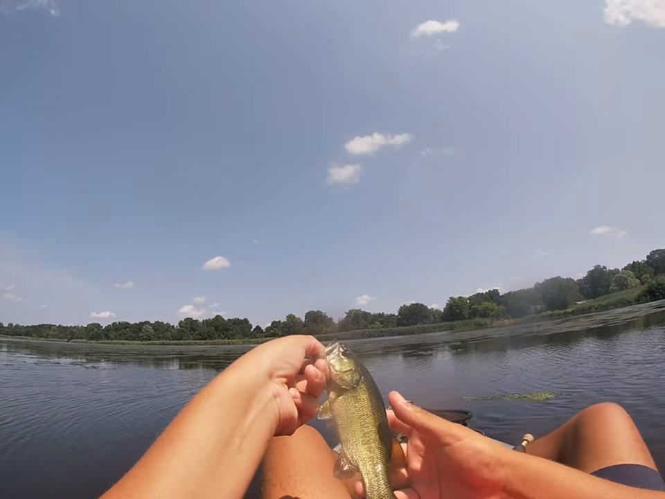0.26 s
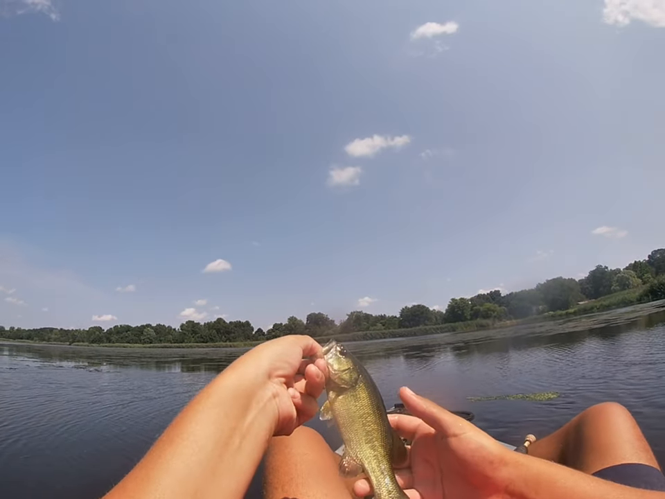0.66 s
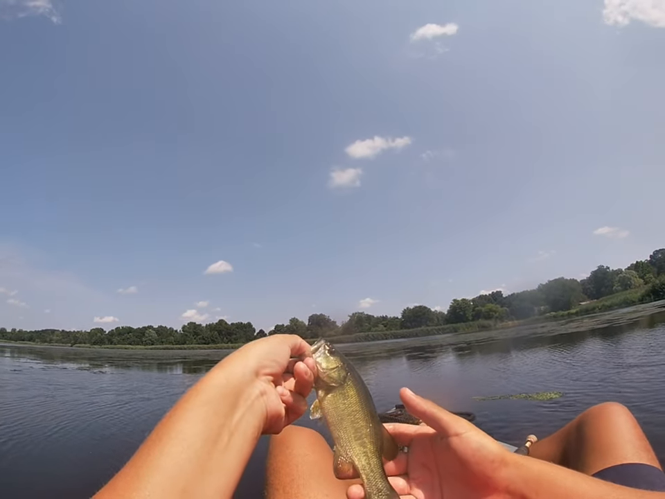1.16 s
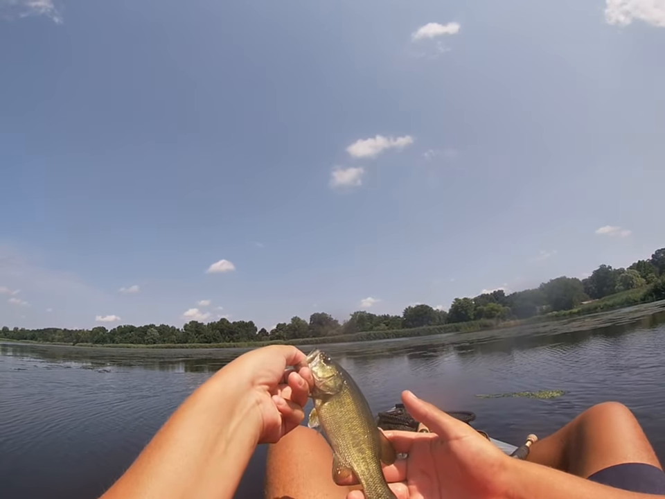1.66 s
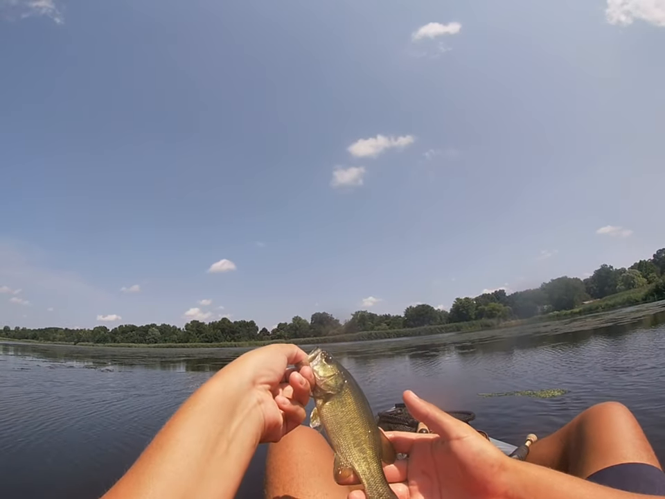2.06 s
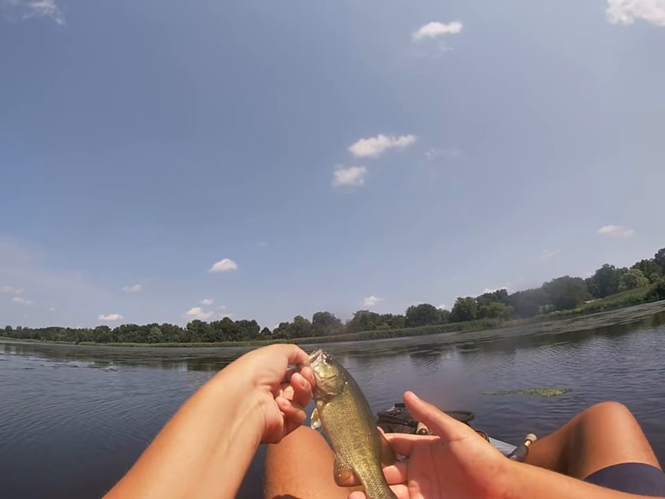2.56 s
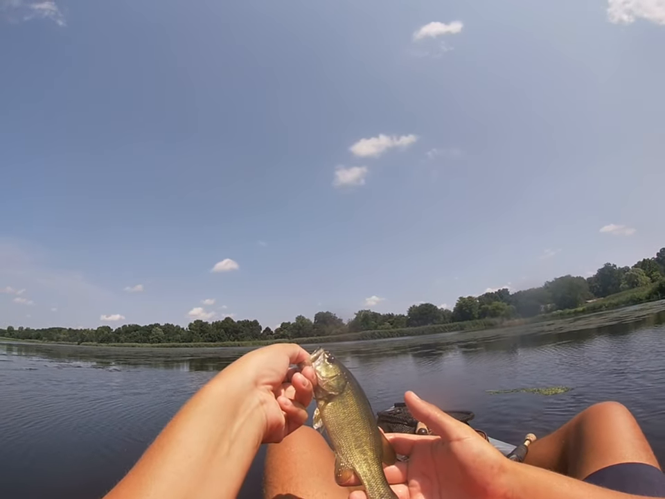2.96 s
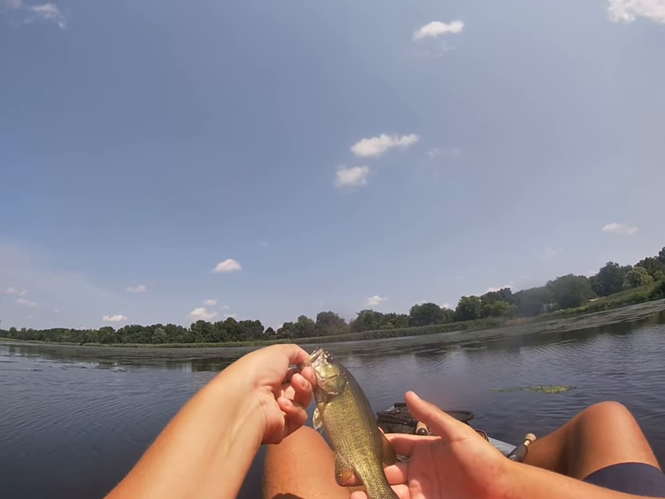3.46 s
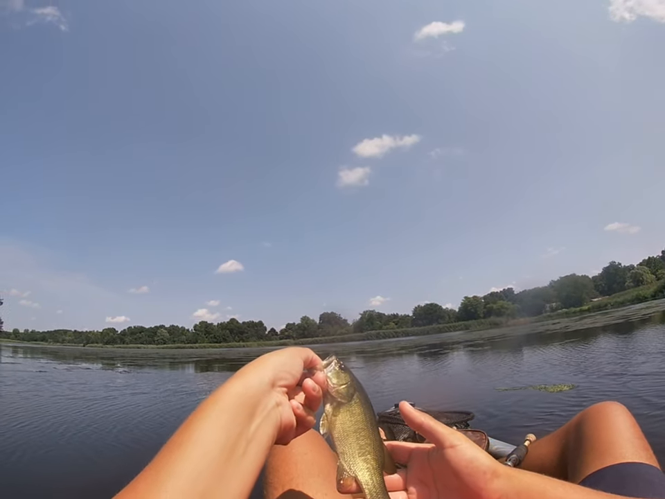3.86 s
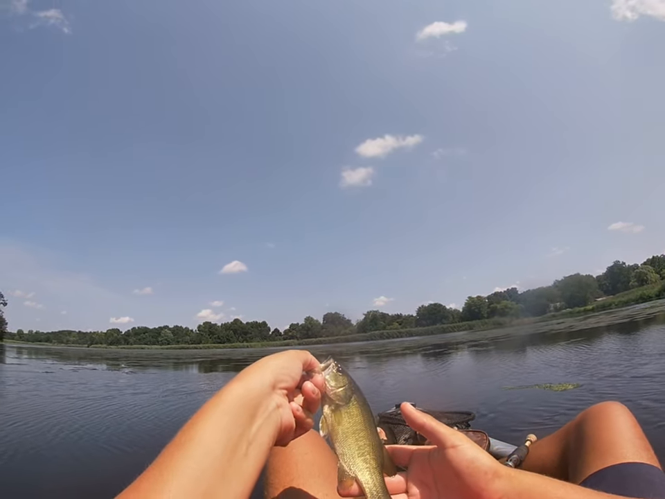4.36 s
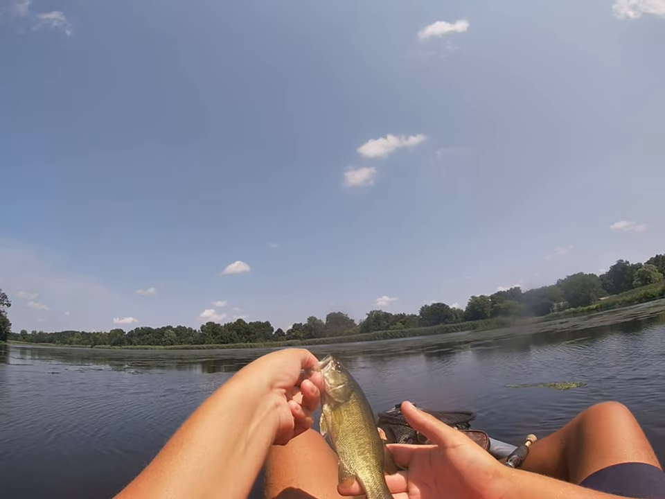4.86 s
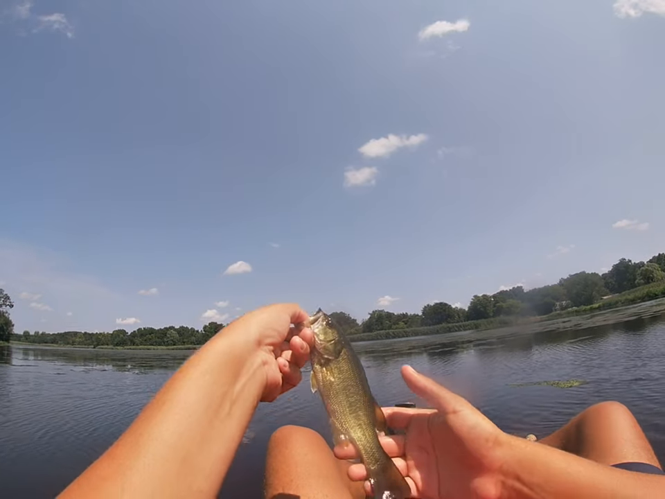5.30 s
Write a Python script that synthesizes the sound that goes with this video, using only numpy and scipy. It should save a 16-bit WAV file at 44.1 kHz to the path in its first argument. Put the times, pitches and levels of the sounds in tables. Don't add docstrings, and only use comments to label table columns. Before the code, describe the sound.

A quiet lake in open air, heard in mono from a small boat. At about 0.05 s something hard knocks the plastic hull, with two very faint bounces by 0.12 s. Throughout, two distant motors drone low at nearly fixed, slightly different pitches, one creeping up and the other down; their overtones waver and fade unevenly, dulling overall. Low wind buffeting and flutter are strong at the opening, ease from about 0.6 to 3 s with a short puff near 1.3 s, and swell again around 3.7-4.6 s. Small dry insect ticks run about five per second, slightly uneven with a few gaps, while a second insect ticks every 0.64 s until about 5.1 s. Faint high trills shimmer, one swelling near 1.8 s. Far traffic and reeds form a soft hiss behind. At 5.42 s a sharp light tap and fuller knock land almost together on the hull.

```python
import sys
import numpy as np
from scipy import signal
from scipy.fft import rfft, irfft
from scipy.io import wavfile
from scipy.ndimage import uniform_filter1d

SR = 44100
rng = np.random.default_rng(int(sys.argv[2]) if len(sys.argv) > 2 else 0)


def to_linear_factor(level_db):
    exponent = np.asarray(level_db, float) / 20
    return 10 ** exponent


def wav_out(sig):
    wavfile.write(sys.argv[1], SR, np.round(np.clip(np.atleast_2d(sig).T, -1, 1) * 32767).astype(np.int16))


N = 243855

# time_s, firing_hz
HIGH_MOTOR_HZ = [(0, 71.9), (.9, 72.05), (3.4, 72.1), (3.7, 72.35), (5.53, 72.4)]
LOW_MOTOR_HZ = [(0, 57.75), (2, 57.5), (3, 57.3), (4.3, 56.95), (5.53, 56.65)]
# time_s, level_db, brightness_db per multiple
HIGH_MOTOR_CARRY = [(0, -41, 1.4), (1.1, -42.5, 1.3), (1.93, -45, 0.36), (3.6, -44.5, -0.57),
                    (5.53, -43, -2.5)]
LOW_MOTOR_CARRY = [(0, -41, 1.3), (.68, -45.5, 0.4), (2.12, -52.5, -0.1), (2.27, -44, -1.2), (4.0, -56, 2),
                   (4.81, -39, -2), (5.13, -48.5, -3), (5.53, -44.5, 0.5)]
HIGH_ORDERS = {1: -2.2, 2: 0, 3: -3.5, 4: -25.5, 5: -24}
LOW_ORDERS = {2: -5.5, 3: 0, 4: -3.5, 5: -15.5, 6: -21}
HIGH_FADES = {1: [(.3, -3.5, .45), (.82, 3, 0.11), (1.08, 5.5, 0.53), (1.88, -7.6, 0.43), (2.64, -4.3, 0.6),
              (3.92, -4.9, .32), (4.56, 4.5, 0.19), (5.08, -8, 0.16)], 2: [(.64, -10, 0.17), (1.12, 4, 0.3),
              (1.65, -4.5, 0.18), (2.64, -7, .15), (2.95, 3, 0.35), (5.4, -3, .2)], 3: [(.72, -15.5, .22),
              (1.48, -11.5, .22), (2.5, 4, .2), (3.1, 4.5, 0.21), (3.38, -7, 0.12), (3.88, 6, 0.34)],
              4: [(.5, 6, .3), (1.3, 8, .4), (1.95, -10, .2), (2.42, 14, 0.22), (3.3, 7, 0.32)],
              5: [(.62, -11, 0.35), (1.12, 8, .4), (2.3, 6.5, 0.25), (3.2, 8, .2)]}
LOW_FADES = {2: [(3.08, -12, 0.49), (3.8, 11, 0.16), (5.52, -8, .45)], 3: [(.72, -8.7, 0.18),
             (1.0, -21, .22), (1.55, 4.5, .2), (2.6, 3.5, 0.33), (4.16, -16, 0.17)], 4: [(.03, -4.5, .15),
             (.45, 1, .3), (.68, -9.5, 0.14), (1.08, -17, .15), (1.98, -9, 0.12), (3.72, 9.5, 0.12),
             (4.28, -11, 0.3), (5.3, 6.5, 0.21)], 5: [(.3, -8, .1), (.78, -4, .15), (1.95, -9.5, 0.27),
             (2.9, -9, .25), (4.3, -13, .4), (4.75, 4, .2), (5.45, 1.5, .3)], 6: [(.45, 6.5, 0.25),
             (1.5, 5, 0.18), (2.38, 8.5, 0.37), (4.8, 5, 0.17), (5.15, -8, 0.3)]}
# start_s, peak_db, pitch_hz, t60_s, rattle_db
KNOCKS = [
    (.054, -31, 1150, 0.024, -37),
    (.066, -52, 900, 0.033, -41.5),
    (.116, -55, 1200, 0.027, -50),
    (5.4216, -37, 6300, 0.011, -42),
    (5.4246, -33, 1594, 0.024, -43.5),
]
# time_s, strength_db
WIND = [(0, -37.5), (.3, -42.5), (.6, -48), (.75, -55), (.95, -46), (1.2, -58), (1.68, -50.5),
        (1.95, -55.5), (2.3, -47), (2.85, -56.5), (3.05, -48.5), (3.7, -40), (4.15, -37.5), (4.33, -48),
        (4.5, -39.5), (5.02, -50), (5.25, -42.5), (5.53, -43.5)]
# centre_s, change_db, length_s
PUFFS = [
    (0, 8.5, 0.28),
    (1.3, 7.5, .12),
    (3.3, 3, .2),
]
# frequency_hz, density_db per Hz
RUMBLE = [(40, -25), (60, 1), (120, -1), (210, -1.5), (240, -12), (270, -30)]
FLUTTER = [(220, -26), (250, 1.5), (330, -4.5), (450, -10.5), (650, -13.5), (1400, -30)]
# strokes_per_s, first_stroke_s, stroke_ms, wing_hz, width_hz, level_db
TRILLS = [
    (29.67, 0.0254, 5.6, 7650, 1340, -70),
    (16.17, 0.04, 36, 7750, 210, -74),
    (15.22, 0.052, 18, 7405, 66, -73.5),
]
# time_s, first_db, second_db, third_db
TRILL_SWELL = [(0, 2, -10, -9), (.5, 0, -15, 1.5), (1.2, 2.5, 2, 0.5), (1.8, 2, 0, 9),
               (2.3, 2.5, -0.5, -14), (3.2, 1, 5.5, -4), (4, 0.5, -7, -3), (4.8, 2, 3, -2), (5.53, 1, 3, 1)]
TICKS = [.17, .374, .5856, .786, 0.99, 1.1992, 1.4052, 1.6095, 1.8168, 2.0166, 2.2256, 2.4298, 2.6317,
         2.8325, 3.037, 3.4445, 3.6516, 4.0582, 4.262, 4.469, 4.6766, 4.883, 5.0915, 5.296, 5.501]
SLOW_BEATS = [0, 1, 2, 3, 4, 5, 6, 8]
# start_s, level_db
STRAY_TICKS = [
    (1.8981, -47),
    (2.1263, -44),
    (3.2286, -48),
]
# pitch_hz, level_db, t60_s
TICK_MODES = [(3500, -4, .005), (4300, -4, .004), (5000, 0, .005), (5600, -3, .004), (7050, -5, .007)]
# frequency_hz, density_db per Hz
TRAFFIC = [(250, -12), (400, -5.5), (600, -7.5), (745, -1.5), (900, -4.5), (1250, -7), (1540, -2.5),
           (1700, -5), (1880, -3), (2150, -8), (2450, -8), (2750, -15.5), (3000, -22.5), (3300, -51)]
REEDS = [(1650, -29), (2800, -10.5), (3110, -6.5), (4050, -8.5), (4860, -5.5), (6470, -9), (7660, -3),
         (8020, -0.5), (8720, -17), (9680, -14), (12300, -23.5), (12900, -19), (13200, -36)]

CALM_DB = -48
BUFFET_DB, RUMBLE_DB, FLUTTER_DB = -48.5, -50, -59
RUMBLE_SHARE, FLUTTER_SHARE = .55, 0.17
RATTLE_WIDTH_HZ, RATTLE_SPREAD = 1030, 0.5
TICK_DB, SLOW_DB = -41.5, -42
SLOW_FIRST_S, SLOW_PERIOD_S = .0054, .64
CHORUS_DB, TRAFFIC_DB, REEDS_DB = -71, -56.5, -63


def curve(table):
    s, *columns = np.transpose(table)
    return [np.interp(np.arange(N) / SR, s, c) for c in columns]


def bumps(rows):
    t = np.arange(N) / SR
    return sum(db * np.exp(-2 * ((t - s) / long_s) ** 2) for s, db, long_s in rows)


def unit(x):
    return x / np.sqrt(np.mean(x ** 2))


def walk(rate):
    k = int(SR / rate)
    held = np.repeat(rng.standard_normal(N // k + 1), k)
    slewed = uniform_filter1d(uniform_filter1d(held, k), k)
    return unit(slewed[:N])


def coloured(points):
    hz, db = np.transpose(points)
    log_hz = np.log(np.arange(N // 2 + 1) * SR / N + 1e-9)
    gain = to_linear_factor(np.interp(log_hz, np.log(hz), db, -200, -200))
    return irfft(rfft(rng.standard_normal(N)) * gain, N)


def band(hz, width_hz):
    bins_hz = np.arange(N // 2 + 1) * SR / N
    resonance = 1 + (2 * (bins_hz - hz) / width_hz) ** 4
    return unit(irfft(rfft(rng.standard_normal(N)) / resonance, N))


def add(out, s, sound):
    i = int(s * SR)
    out[i:i + len(sound)] += sound[:N - i]


def ring(hz, t60, contact_s=.00015):
    t = np.arange(int(t60 * SR)) / SR
    return np.sin(2 * np.pi * hz * t) * (1 - np.exp(-t / contact_s)) ** 2 * 1000. ** (-t / t60)


def motors():
    high = motor(HIGH_MOTOR_HZ, HIGH_ORDERS, overtones(HIGH_MOTOR_CARRY, HIGH_ORDERS, HIGH_FADES))
    low = motor(LOW_MOTOR_HZ, LOW_ORDERS, overtones(LOW_MOTOR_CARRY, LOW_ORDERS, LOW_FADES))
    return high + low


def motor(firing_hz, multiples, levels_db):
    phase = 2 * np.pi * np.cumsum(curve(firing_hz)[0]) / SR
    gust = np.clip((curve(WIND)[0] + 55) / 15, 0, 1)
    wobble_rad, shake_db = .25 + .4 * gust, 1.2 + 1.8 * gust
    out = np.zeros(N)
    for k, db in zip(multiples, levels_db):
        level = np.sqrt(2) * to_linear_factor(db + shake_db * walk(14))
        start_phase = 2 * np.pi * rng.random()
        out += level * np.sin(k * phase + start_phase + np.sqrt(k / 2) * wobble_rad * walk(10))
    return out


def overtones(carry, orders, fades):
    level_db, tilt_db = curve(carry)
    middle = sorted(orders)[1]
    return [level_db + db + (k - middle) * tilt_db + bumps(fades[k])
            for k, db in orders.items()]


def knocks():
    out = np.zeros(N)
    for s, db, hz, t60, rattle_db in KNOCKS:
        for ratio, mode_db in ((.75, -5), (1, 0), (1.18, -5), (1.4, -10)):
            add(out, s, to_linear_factor(db - 5 + mode_db) * ring(hz * ratio, t60, contact_s=.0005))
        t = np.arange(int(t60 * SR)) / SR
        envelope = (1 - np.exp(-t / 0.00021)) * 1000. ** (-t / t60)
        rattle = band(hz, RATTLE_WIDTH_HZ + RATTLE_SPREAD * hz)[:len(t)]
        add(out, s, to_linear_factor(rattle_db) * rattle * envelope)
    return out


def wind():
    gust_db = curve(WIND)[0] - CALM_DB
    lumps = walk(16)
    buffet_db = BUFFET_DB + gust_db + 2.5 * walk(6.08) + 2.7 * lumps
    rumble_db = RUMBLE_DB + RUMBLE_SHARE * gust_db + 2.0 * lumps
    flutter_db = FLUTTER_DB + FLUTTER_SHARE * gust_db + bumps(PUFFS)
    flutter_db = flutter_db - 2.0 + 0.64 * lumps + 0.67 * walk(14)
    buffet = unit(coloured([(5, 1), (11, 1), (20, -3.5), (35, -4), (55, -9.0), (70, -32)]))
    return (to_linear_factor(buffet_db) * buffet
            + to_linear_factor(rumble_db) * unit(coloured(RUMBLE))
            + to_linear_factor(flutter_db) * unit(coloured(FLUTTER)))


def ticks():
    out = np.zeros(N)
    uneven = [(s, TICK_DB) for s in TICKS]
    strict = [(SLOW_FIRST_S + SLOW_PERIOD_S * k, SLOW_DB) for k in SLOW_BEATS]
    rows = uneven + strict + STRAY_TICKS
    chance = rng.standard_normal((len(rows), 2, len(TICK_MODES)))
    for (s, db), (detune, size) in zip(rows, chance):
        for (hz, mode_db, t60), d, z in zip(TICK_MODES, detune, size):
            sound = to_linear_factor(db + mode_db + .8 * z) * ring(hz * (1 + .01 * d), t60)
            add(out, s + 0.000785, sound)
            add(out, s + .0021, to_linear_factor(-5) * sound)
    return out


def insects():
    t = np.arange(N) / SR
    out = to_linear_factor(CHORUS_DB + 0.58 * walk(24)) * band(7460, 810)
    for (rate, first, ms, hz, width_hz, db), swell_db in zip(TRILLS, curve(TRILL_SWELL)):
        turn = ((t - first) * rate + 0.04 * walk(2.93) + .5) % 1 - .5
        stroke = unit(np.exp(-.5 * (turn / rate / (ms / 2000)) ** 2))
        out = out + to_linear_factor(db + swell_db + 1.0 * walk(rate)) * stroke * band(hz, width_hz)
    return out


def wash(points, level_db, flicker_db=1.25):
    hz, db = np.transpose(points)
    out, swell = 0, walk(1.2)
    for low_hz in 200 * 2 ** np.arange(0, 6.5, .5):
        edges_hz = np.geomspace(low_hz, low_hz * np.sqrt(2), 12)
        edges_db = np.interp(np.log(edges_hz), np.log(hz), db, -200, -200)
        part = coloured(np.c_[edges_hz, edges_db])
        out = out + part * to_linear_factor(0.79 * swell + flicker_db * walk(12))
    return to_linear_factor(level_db) * unit(out)


def scene():
    near = knocks() + wind() + ticks() + insects()
    background = wash(TRAFFIC, TRAFFIC_DB) + wash(REEDS, REEDS_DB, flicker_db=1.2)
    return (motors() + near + background)[None]


def low_pass(x):
    return signal.sosfilt(signal.butter(12, 13370, fs=SR, output="sos"), x)


def record(dry):
    return low_pass(dry)


dry = scene()
out = record(dry)
wav_out(out)
```